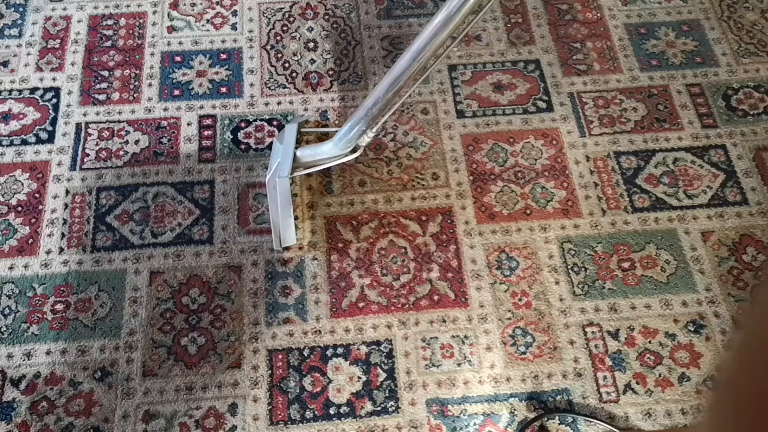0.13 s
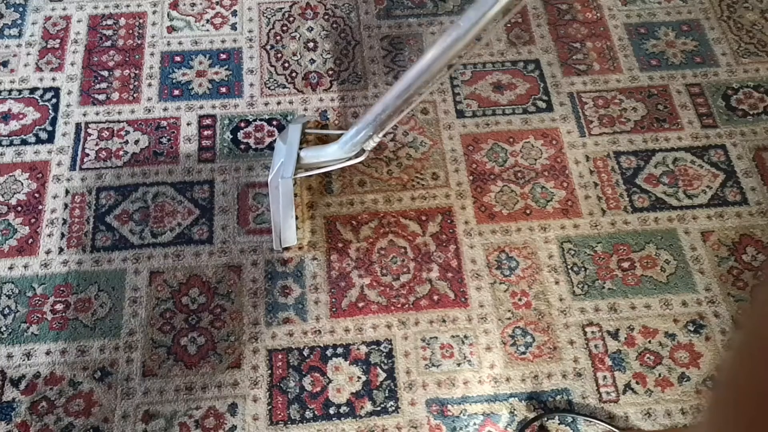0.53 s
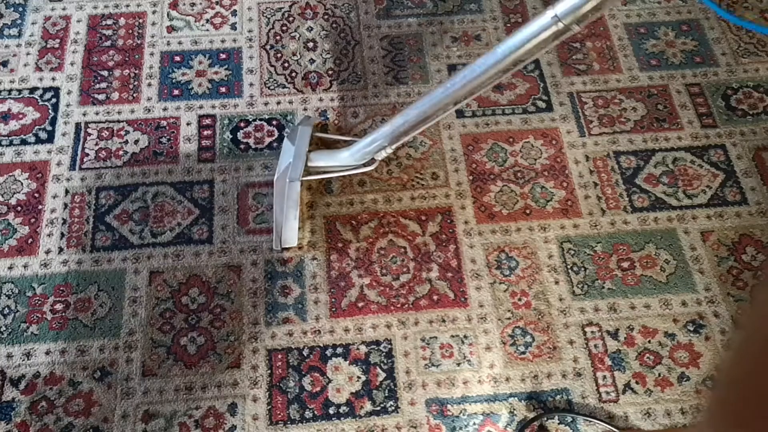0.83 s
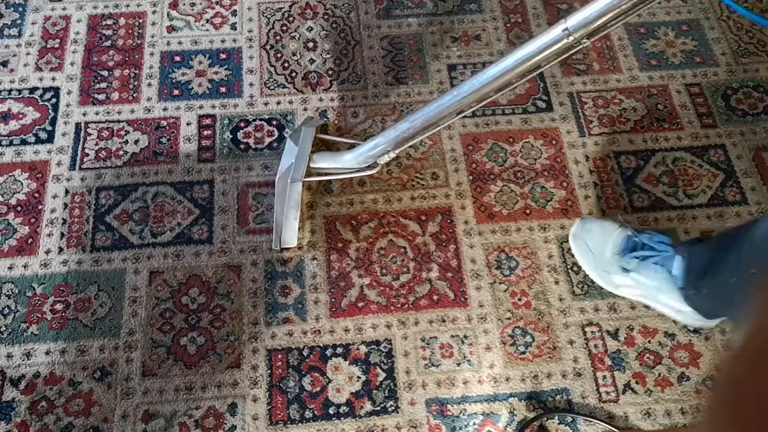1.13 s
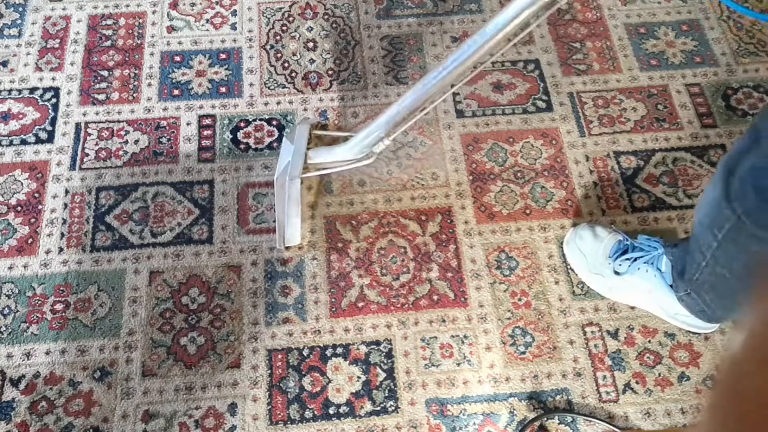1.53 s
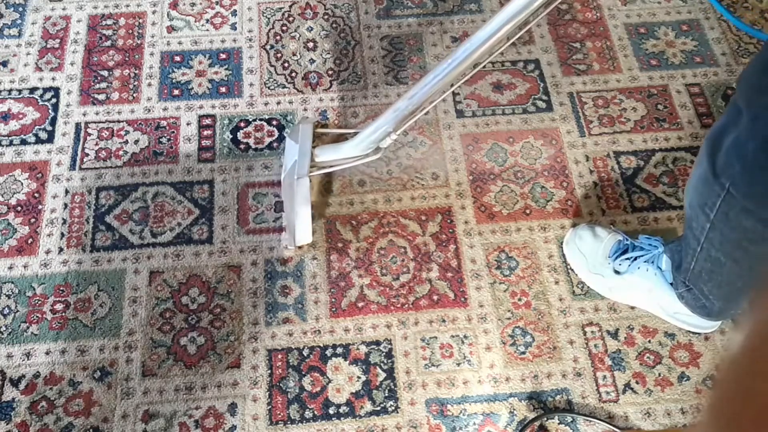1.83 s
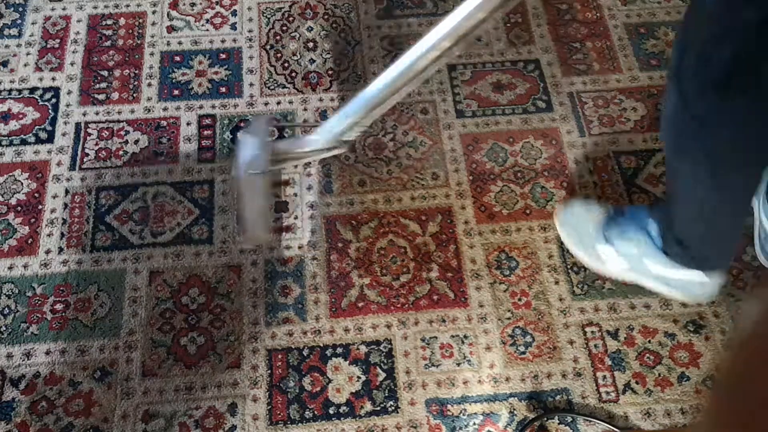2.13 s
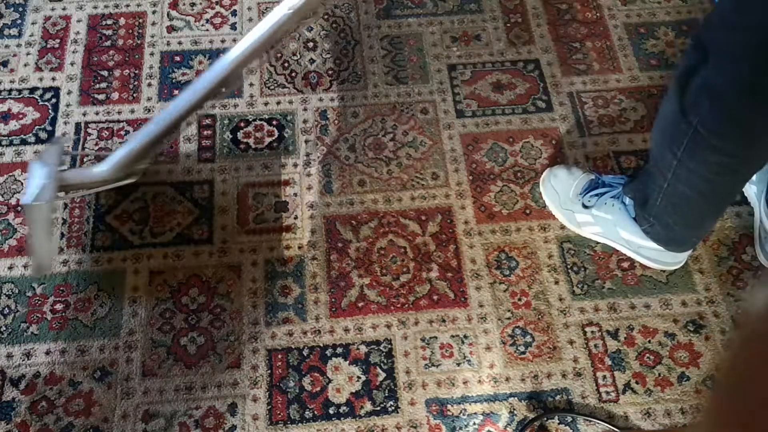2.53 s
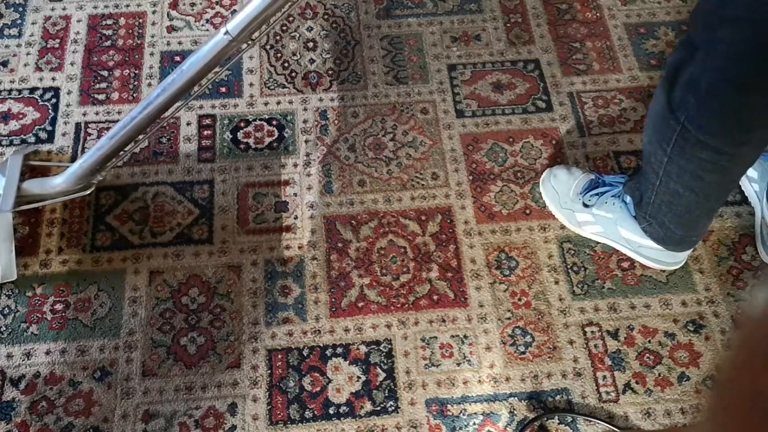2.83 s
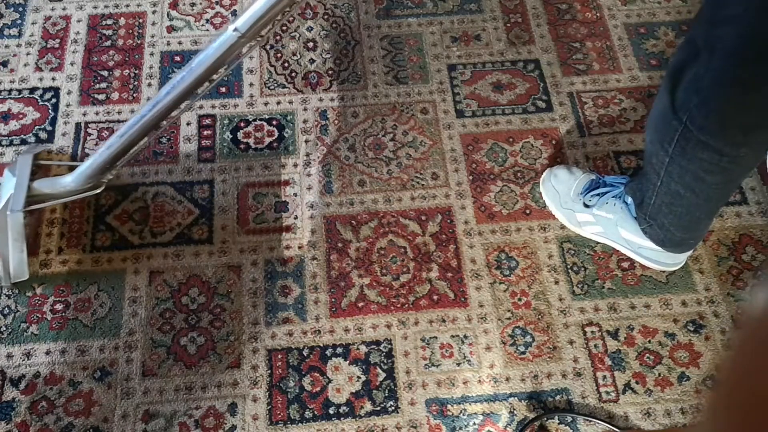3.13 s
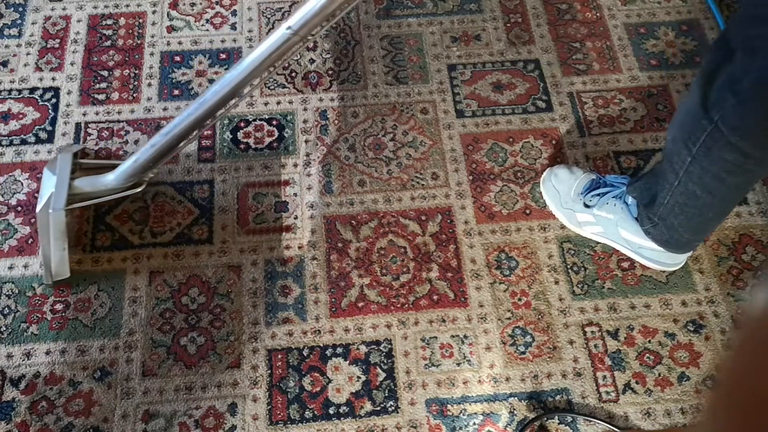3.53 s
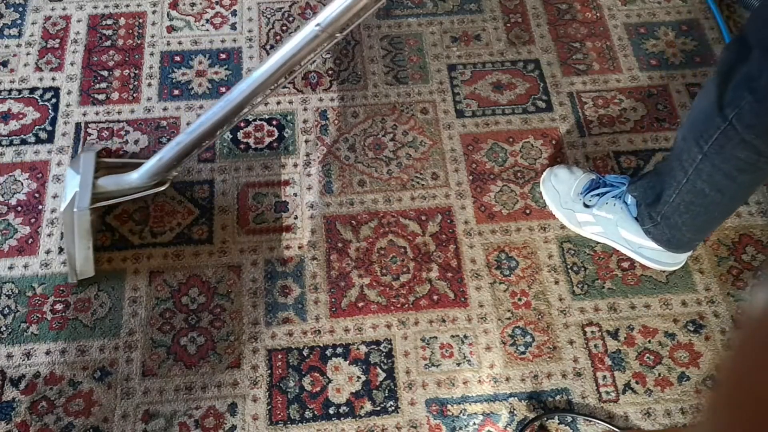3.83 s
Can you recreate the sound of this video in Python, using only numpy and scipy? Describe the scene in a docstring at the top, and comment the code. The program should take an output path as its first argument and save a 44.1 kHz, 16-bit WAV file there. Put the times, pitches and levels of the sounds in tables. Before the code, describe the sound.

Indoors, close by in stereo, a carpet extraction machine rushes with air over wavering blower whistles; twice its jets hiss with a deeper drone, with a wet slurp and short squeal between as the wand slides.

```python
"""After a short silence, air abruptly rushes into a carpet cleaner's wand over steady blower tones, indoors.
Twice the spray valve opens: jets hiss, and the machine's drive speeds up into a deep drone.
The nozzle slurps and squeals as it shifts over the rug. Air and water are coloured noise, blower and hose
tones waver, the drive stacks multiples of its speed, slurps are short noise bands, squeals gliding tones."""
import sys
import numpy as np
from scipy import signal
from scipy.fft import rfft, irfft
from scipy.io import wavfile
from scipy.ndimage import uniform_filter1d

SR = 44100
rng = np.random.default_rng(int(sys.argv[2]) if len(sys.argv) > 2 else 0)


def dump_mix(stems):
    """Bounce the given channels to the path in sys.argv[1] as a 16-bit WAV at rate SR."""
    frames = np.atleast_2d(stems).T  # one column per channel
    limited = np.clip(frames, -1, 1)  # hard clip at full scale
    pcm = np.round(limited * 32767).astype(np.int16)
    wavfile.write(sys.argv[1], SR, pcm)


N = 176400  # samples: 4 s

# Slow swell of the low air roar, shared by hose and resonances. Each row: time in seconds, level change in dB.
ROAR_LEVEL = [(.4, 0), (.85, 0.5), (1, 0), (1.33, 0.5), (1.6, -2.5), (2.05, -2), (2.7, 1), (3.1, -0.5),
              (3.7, -0.5), (4, -1.5)]


def amp(db):
    """Decibels to gain."""
    return 10 ** (np.asarray(db) / 20)


def unit(x):
    """Scales to rms 1."""
    return x / np.sqrt(np.mean(abs(x) ** 2) + 1e-20)


def curve(points, t):
    """Reads a table over time."""
    return np.interp(t, *np.transpose(points))


def colour(points, hz):
    """Reads a table over log frequency."""
    f, value = np.transpose(points)
    return np.interp(np.log(hz + 1), np.log(f + 1), value)


def ramp(t, start, length):
    """Smooth step from 0 to 1."""
    return np.sin(np.pi / 2 * np.clip((t - start) / length, 0, 1)) ** 2


def drift(rate_hz):
    """Slow random motion of rms 1: noise low-passed at the given rate."""
    f = np.fft.rfftfreq(N, 1 / SR)
    lowpass = (f > 0) / (1 + (f / rate_hz) ** 4)
    return unit(irfft(rfft(rng.standard_normal(N)) * lowpass, N))


def tone(hz, waver_hz, rate_hz):
    """A complex tone whose pitch wavers at random."""
    turns = np.cumsum(hz + waver_hz * drift(rate_hz)) / SR
    return np.exp(2j * np.pi * (turns + rng.random()))


def place(z, balance_db, lead):
    """Puts a complex tone on the two microphones, by left-right level and left phase lead in radians."""
    left = z * amp(balance_db / 2) * np.exp(.5j * lead)
    right = z * amp(-balance_db / 2) * np.exp(-.5j * lead)
    return np.sqrt(2) * np.array([left, right]).real


def air(shape_db):
    """Stereo noise of rms 1 with a given spectrum; the room's reflections leave a fine, fixed ripple on it."""
    # How the two microphones differ. Each row: frequency in Hz, likeness from 0 to 1,
    # left-right level in dB, left phase lead in radians.
    pair = [(102, 0.99, 2, 0.35), (160, 0.97, 0.5, 0.16), (201, 0.77, -2.5, 0), (273, 0.77, -2, 1.1),
            (350, 0.9, -5.5, -1.16), (437, 0.5, 2, -2), (523, 0.86, -7, -2.5), (622, 0.63, 2.5, -3),
            (760, 0.4, -7, -4), (950, 0.28, -6, -2.5), (1040, 0.44, 1, -4), (1280, 0.54, -5, -6),
            (1640, 0, -3, -6), (2060, 0.08, -3, -5.5), (2370, 0.21, -1, -3.5), (3290, 0.1, 0, -6),
            (4440, 0.6, 3, -4.5), (6230, 0, 2.5, -6), (7820, 0.07, 7, -3), (9100, 0, -4, -3),
            (14000, 0.1, 3, 0)]
    ripple_db, ripple_width_hz = 1.5, 22
    hz = np.fft.rfftfreq(N, 1 / SR)
    a, b = rfft(rng.standard_normal((2, N)))
    same, balance_db, lead = (colour([(row[0], row[k]) for row in pair], hz) for k in range(1, 4))
    same = np.clip(same, 0, 1)
    side = amp(balance_db / 2)
    right = (same * a + np.sqrt(1 - same ** 2) * b) * np.exp(-1j * lead)
    grain = rng.standard_normal((2, len(hz)))
    ripple = unit(uniform_filter1d(grain, round(ripple_width_hz * N / SR), axis=1))
    # the ripple is deepest where the two sides are least alike
    gain = amp(shape_db(hz) + ripple_db * (1 - same ** 2) * ripple)
    return unit(irfft(np.array([a * side, right / side]) * gain, N))


def hiss_fall(hz):
    """The air's treble edge in dB: a steep fall of 52 dB per octave above 9100 Hz."""
    return -52 * np.log2(np.maximum(hz / 9100, 1))


def suction(t):
    """Turbulent air: a low roar in the hose and a brighter rush at the nozzle."""
    # Spectrum of the moving air. Each row: frequency in Hz, relative level per Hz in dB.
    spectrum = [(18, -26), (48, -11.5), (70, -22), (100, -2), (125, -16), (160, -11), (195, -14.5),
                (250, -12.5), (320, -8), (410, -5.5), (450, -10), (550, -10.5), (650, -18), (780, -19.5),
                (950, -17.5), (1150, -18.5), (1400, -20.5), (1550, -25), (1750, -16), (2100, -19.5),
                (2750, -21), (3250, -30.5), (3470, -26), (4100, -32.5), (5600, -34), (6300, -33),
                (7650, -31.5), (9000, -36), (10000, -42), (13000, -70), (22000, -100)]
    # Swell of the rush at the nozzle. Each row: time in seconds, level change in dB.
    rush_level = [(.4, 5), (.58, 1.5), (.73, 4), (.9, 0.5), (1.4, 0), (1.85, 0.5), (2.05, 3), (2.25, 1.5),
                  (2.55, 1), (2.75, 1), (3, -0.5), (4, -1)]
    level_db, roar_top_hz = -31.5, 590
    noise = air(lambda hz: colour(spectrum, hz) + hiss_fall(hz))
    lowpass = 1 / (1 + (np.fft.rfftfreq(N, 1 / SR) / roar_top_hz) ** 6)
    low = irfft(rfft(noise) * lowpass, N)
    roar = low * amp(curve(ROAR_LEVEL, t) + .6 * drift(rate_hz=9))
    rush = (noise - low) * amp(curve(rush_level, t) + .5 * drift(rate_hz=16))
    return amp(level_db) * (roar + rush)


def blower(t):
    """The blower's hum, whistles and whines, with fainter tones of hose and nozzle, all swaying together."""
    # Slow sway of the blower. Each row: time in seconds, speed in turns per second.
    sway = [(.4, 284.3), (.9, 284.25), (1.2, 285.2), (1.6, 286.4), (2.05, 287), (2.3, 286.2), (2.7, 284.8),
            (3.05, 284.3), (3.3, 284.8), (3.6, 286.2), (4, 287.8)]
    # Fainter tones of hose and nozzle. Each row: mean pitch in Hz, centre level in dB, pitch waver in Hz,
    # level swell in dB, left-right level in dB, left phase lead in radians.
    faint_tones = [(396.5, -49.5, 6.94, 3.5, 9.5, -0.3), (551, -56, 5.1, 2.5, -6, -2.5),
                   (923.5, -51.5, 5.8, 2, -4.5, -2), (1003, -51.5, 3, 2.5, -4, -2),
                   (1050, -55, 6.6, 4, -2, -1.5), (1263, -56.5, 6, 2.5, -3, 1),
                   (1376, -56.5, 4.9, 1.5, 3, 2), (2050, -63, 5.4, 5.5, -2, 2),
                   (2312, -56, 6.04, 4, -10.5, 4.5)]
    # Level of the hum. Each row: time in seconds, level in dB.
    hum_level = [(.4, -36.5), (.55, -39.5), (.7, -32.5), (.87, -33), (1.03, -41), (1.55, -34.5),
                 (1.95, -35.5), (2.3, -33.5), (2.75, -34), (2.88, -41.5), (3, -35.5), (3.17, -45.5),
                 (3.37, -35), (3.53, -40.5), (3.7, -32.5), (4, -33)]
    # Levels of the two whistles. Each row: time in seconds, level in dB.
    low_whistle_level = [(.4, -44), (.7, -47.5), (.93, -39.5), (1.25, -52.5), (1.75, -47.5), (2.1, -43),
                         (2.65, -44), (2.92, -37), (3.3, -39), (3.62, -48.5), (4, -42.5)]
    high_whistle_level = [(.4, -61), (.95, -55), (1.05, -48), (1.35, -45.5), (1.95, -44), (2.15, -47.5),
                          (3, -56), (3.38, -51), (3.52, -47.5), (3.66, -41), (3.81, -43), (3.87, -49)]
    # Levels of the two thin whines. Each row: time in seconds, level in dB before a common trim.
    low_whine_level = [(.4, -58), (.92, -54.5), (1.2, -60), (2.1, -60), (2.279, -50.5), (2.55, -57),
                       (2.8, -63), (4, -59)]
    high_whine_level = [(.4, -70), (.95, -62), (1.18, -55.5), (1.4, -65), (2.3, -61.5), (2.5, -60),
                        (2.8, -56), (3.05, -60), (3.3, -53), (3.55, -63), (4, -66)]
    whine_trim_db = -1.3

    speed = curve(sway, t)
    out = np.zeros((2, N))
    for hz, db, waver, swell, side, lead in faint_tones:
        z = tone(hz * speed / speed.mean(), waver, rate_hz=12.9)
        out += place(z * amp(db + swell * drift(rate_hz=2.0)), side, lead)

    hum = tone(speed, waver_hz=0.53, rate_hz=9.1) * amp(curve(hum_level, t))
    out += place(hum, balance_db=0.0, lead=0.82)

    # whistle pitches are multiples of the speed
    low = tone(2.582 * speed, waver_hz=0.9, rate_hz=14)
    low_gain = amp(curve(low_whistle_level, t) + 0.46 * drift(rate_hz=14.0))
    out += place(low * low_gain, balance_db=-8.5, lead=2.6)
    high = tone(6 * speed, waver_hz=0.96, rate_hz=33)
    high_gain = amp(curve(high_whistle_level, t) + 0.89 * drift(rate_hz=39))
    out += place(high * high_gain, balance_db=-7.0, lead=0.3)

    low_whine_hz = 12 * speed
    # 4459 Hz at the slowest speed; its pitch sways further than the speed
    high_whine_hz = 4459 * (speed / speed.min()) ** 1.45
    for hz, level in (low_whine_hz, low_whine_level), (high_whine_hz, high_whine_level):
        whine = tone(hz, waver_hz=2.5, rate_hz=45)
        gain = amp(curve(level, t) + whine_trim_db + 2.2 * drift(rate_hz=12))
        out += place(whine * gain, balance_db=-8, lead=1.27)
    return out


def drive(t):
    """The drive throbs at idle and speeds up to a drone under load, as tones that change balance."""
    # The drive's course. Each row: time in seconds, speed in turns per second, load from 0 to 1.
    course = [(1.5, 28.85, 0), (1.65, 32.22, 0.2), (1.73, 33.14, 1), (1.86, 33.87, 0.8),
              (2.06, 34.35, 0.93), (2.12, 31.45, 0), (2.25, 28.93, 0), (3.1, 28.86, 0.01),
              (3.17, 33.32, 0.35), (3.245, 33.23, 0.8), (3.41, 33.87, 0.5), (3.47, 33.68, 0.96),
              (4, 33.7, 0.9)]
    # Its tones, with a hum near 100 Hz at idle carried as multiple 3.5. Each row: multiple of the speed,
    # steady level at idle in dB, steady level at full load in dB.
    orders = [(1, -50.5, -59), (2, -70, -42.5), (3, -39, -21), (3.5, -39, -56), (4, -46.5, -33),
              (5, -46.5, -60), (7, -52.5, -51.5), (8, -49, -69)]
    times, speeds, loads = np.transpose(course)
    speed, load = np.interp(t, times, speeds), np.interp(t, times, loads)
    turns = np.cumsum(speed * (1 + .003 * drift(rate_hz=6))) / SR
    out = np.zeros(N)
    for order, idle_db, loaded_db in orders:
        level = amp(idle_db) * (1 - load) + amp(loaded_db) * load
        if 3 <= order <= 5:  # the middle tones shake, half as much at full load
            level = level + amp(-51.5) * drift(rate_hz=11.0) * (1 - load / 2)
        out += np.sqrt(2) * level * np.cos(2 * np.pi * (order * turns + rng.random()))
    return out


def spray(t):
    """The jets hiss while the valve is open, easing as pressure sags; the water sizzles back up the nozzle."""
    # Valve openings. Each row: opening time in seconds, shutting time in seconds, starting jet level in dB
    # relative to the common jet level.
    openings = [(1.408, 2.01, 1.5), (2.963, 4.2, -2.5)]
    # Spectrum of the jets. Each row: frequency in Hz, relative level per Hz in dB.
    jet_spectrum = [(100, -30), (1500, -2), (4000, -3), (7500, 2.5), (9500, 0.5), (11000, -7.5),
                    (14500, -8.5)]
    # Spectrum of water drawn into the nozzle. Each row: frequency in Hz, relative level per Hz in dB.
    wet_spectrum = [(100, -13), (1200, -11), (2000, 5.5), (2900, 4), (3500, -2.5), (4200, 0), (5000, -2.5),
                    (5700, -0.5), (6400, -7), (7700, 0), (9000, -8), (10500, -20.5), (14500, -46)]
    # Level of that water. Each row: time in seconds, level in dB.
    wet_level = [(.4, -45), (.68, -46), (.74, -37.5), (.86, -47.5), (1.4, -49), (1.52, -35.5),
                 (1.85, -36.5), (2, -33.5), (2.06, -39), (2.12, -62), (2.96, -52.5), (3.07, -36.5),
                 (3.16, -34.5), (3.28, -40.5), (3.65, -43), (4, -40)]
    # Level of the fizz in the nozzle slot. Each row: time in seconds, level in dB.
    fizz_level = [(.4, -62), (.75, -52), (1.1, -54), (1.5, -56), (1.8, -42), (2, -38), (2.12, -54),
                  (2.95, -53.5), (3.1, -43.5), (3.35, -39.5), (3.72, -45), (3.9, -40), (4, -39.5)]
    jet_db, sag_db_per_s = -41, 6
    open_s, shut_s = 0.024, 0.042
    fizz_hz, fizz_half_width_hz = 7560, 1280

    valve = np.zeros(N)
    for on, off, db in openings:
        pressure = amp(db - sag_db_per_s * np.maximum(t - on, 0))
        valve += pressure * ramp(t, on, open_s) * (1 - ramp(t, off, shut_s))
    jets = air(lambda hz: colour(jet_spectrum, hz)) * valve * amp(jet_db + 1.9 * drift(rate_hz=24))

    def slot_resonance(hz):
        """A single broad peak in dB, with the air's treble edge."""
        return -20 * np.log10(1 + ((hz - fizz_hz) / fizz_half_width_hz) ** 2) + hiss_fall(hz)

    fizz = air(slot_resonance) * amp(curve(fizz_level, t))
    water = air(lambda hz: colour(wet_spectrum, hz)) * amp(curve(wet_level, t))
    sizzle = amp(0.69 * drift(rate_hz=110))
    return jets + (fizz + water) * sizzle


def slurps(t):
    """Slurps and rushes at the nozzle and low booms of the hose: short noise bands, most of them gliding."""
    # Each row: start in seconds, length in seconds, first pitch in Hz, last pitch in Hz,
    # bandwidth in Hz, peak level in dB.
    gusts = [(2.2, .24, 1440, 1300, 290, -44.5), (2.015, 0.054, 2420, 2180, 240, -37),
             (1.97, 0.1384, 2950, 2800, 720, -38.5), (1.97, 0.103, 840, 1200, 390, -40.5),
             (3.07, .19, 3100, 2750, 430, -42), (3.7, 0.2, 2800, 2800, 550, -55),
             (2.6, 0.28, 1500, 1200, 100, -46), (2.66, .12, 1030, 1700, 110, -43),
             (1.98, 0.154, 152, 153, 18, -31.5), (.36, .42, 1130, 1200, 700, -37.5),
             (0.332, 0.644, 370, 350, 120, -32.5)]
    out, f = np.zeros((2, N)), np.fft.fftfreq(N, 1 / SR)
    for start, length, from_hz, to_hz, width, db in gusts:
        u = np.clip((t - start) / length, 0, 1)
        swell = np.sqrt(abs(np.sin(np.pi * u)))
        noise = np.fft.fft(rng.standard_normal((2, N)))
        band = np.fft.ifft(noise / (1 + (f / width * 2) ** 2))
        # a copy shifted by half the length serves as the imaginary part
        band = band + 1j * np.roll(band, N // 2, axis=1)
        carrier = np.exp(2j * np.pi * np.cumsum(from_hz + (to_hz - from_hz) * u) / SR)
        out += amp(db) * swell * unit((band * carrier).real)
    return out


def squeal(t):
    """Air whistles past the nozzle's lip in short, fluttering glides as it starts to slide."""
    # Two squeals. Each row: time in seconds, pitch in Hz, level in dB.
    low_glide = [(1.97, 1285, -62), (2.0, 1275, -45), (2.035, 1250, -34.5), (2.055, 1240, -44),
                 (2.075, 1243, -37.5), (2.115, 1313, -42), (2.141, 1330, -65)]
    high_glide = [(2.03, 1408, -62), (2.058, 1405, -39), (2.11, 1371, -49), (2.13, 1397, -34),
                  (2.15, 1324, -46), (2.19, 1300, -39.5), (2.215, 1258, -65)]
    out = np.zeros((2, N))
    for glide in low_glide, high_glide:
        times, pitch, db = np.transpose(glide)
        level = np.interp(t, times, amp(db), left=0, right=0)
        flutter = amp(2.2 * drift(rate_hz=110))
        z = tone(np.interp(t, times, pitch), waver_hz=24, rate_hz=132)
        out += place(z * level * flutter, balance_db=2, lead=0.74)
    return out


def booms(t):
    """Narrow resonances, stirred by turbulence, surge irregularly in the air stream."""
    # Each row: resonance in Hz, width in Hz, level in dB before the roar's swell.
    resonances = [(111.8, 13, -43), (153.6, 18, -44), (397.5, 19, -43.5), (515, 110, -54.5)]
    out = np.zeros((2, N))
    for hz, width, db in resonances:
        out += amp(db) * air(lambda f: -20 * np.log10(1 + (2 * (f - hz) / width) ** 2))
    return out * amp(curve(ROAR_LEVEL, t))


def scene():
    """Machine, suction and spray together."""
    t = np.arange(N) / SR
    return suction(t) + blower(t) + drive(t) + spray(t) + slurps(t) + squeal(t) + booms(t)


def record(dry):
    """An abrupt start out of silence and an upper band limit."""
    start_s, edge_hz = .398, 14550
    opened = dry * ramp(np.arange(N) / SR, start_s, .001)
    lowpass = signal.firwin(511, edge_hz, window=("kaiser", 9), fs=SR)
    return signal.oaconvolve(opened, lowpass[None], "same")


dry = scene()
out = record(dry)
dump_mix(out)
```